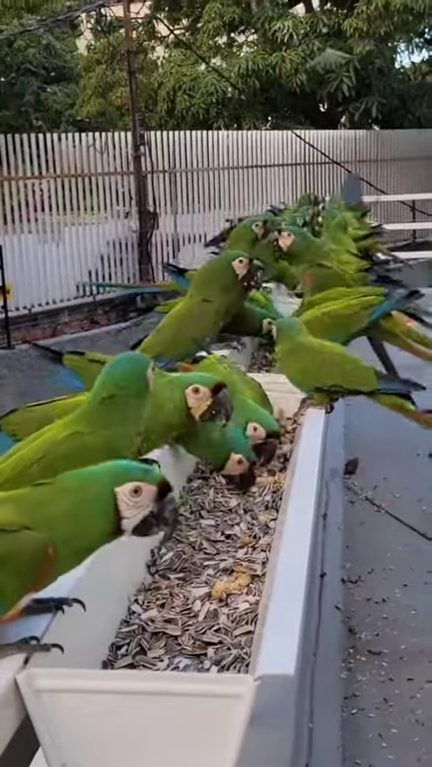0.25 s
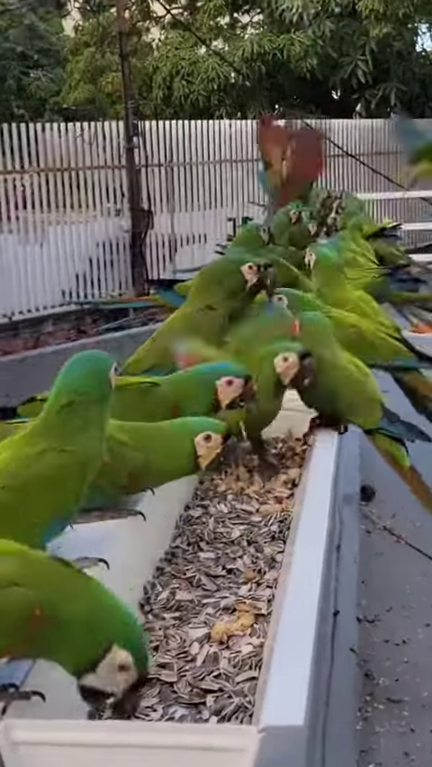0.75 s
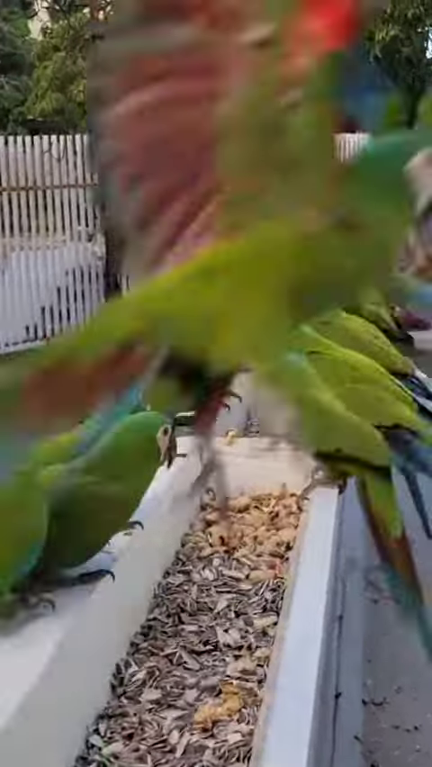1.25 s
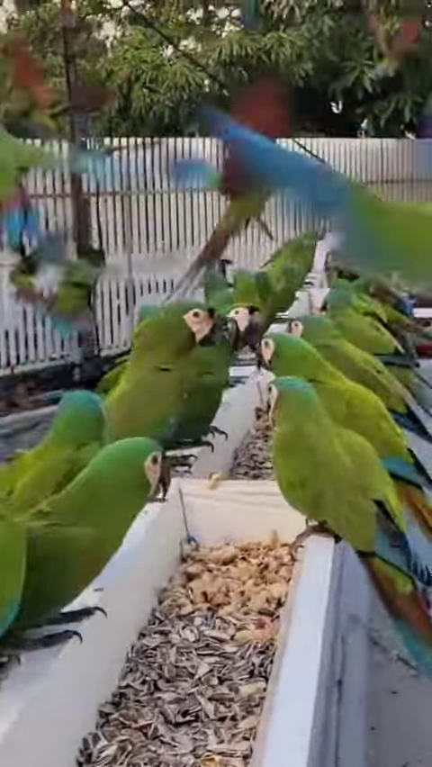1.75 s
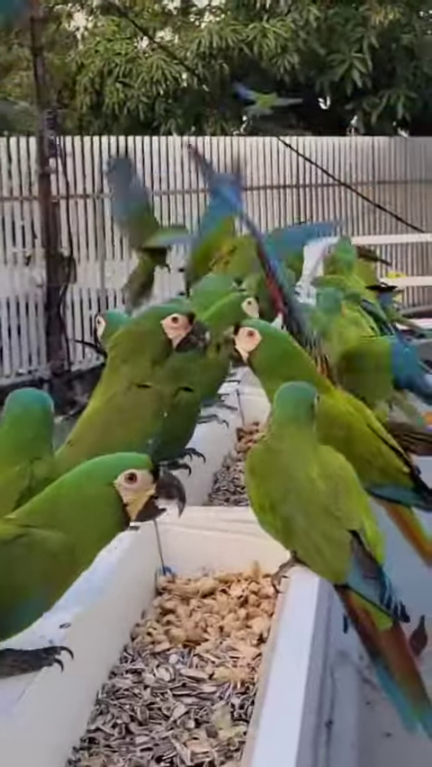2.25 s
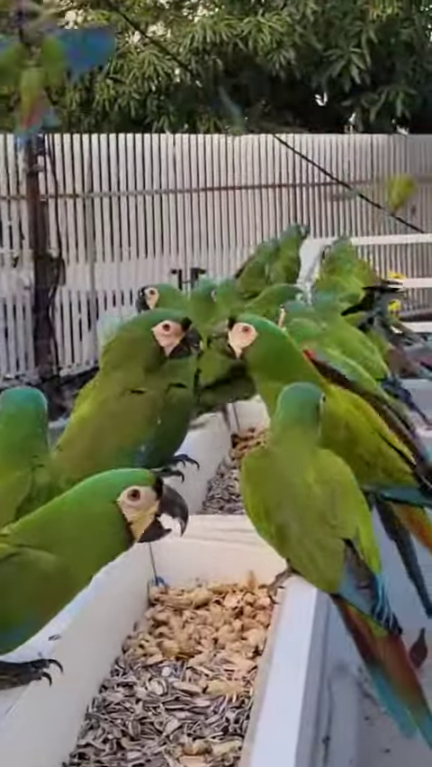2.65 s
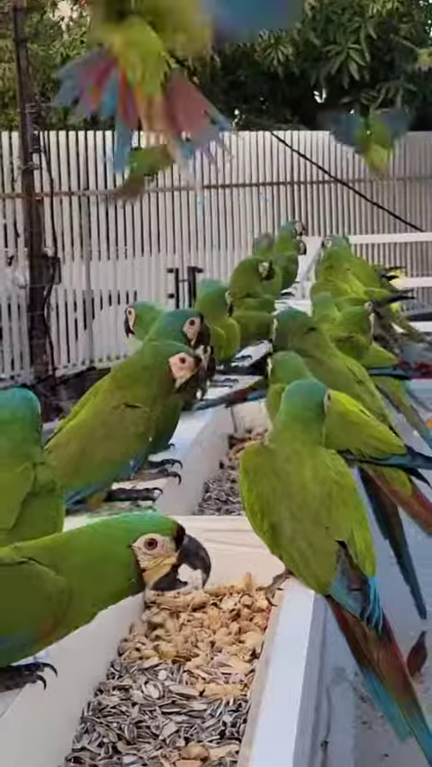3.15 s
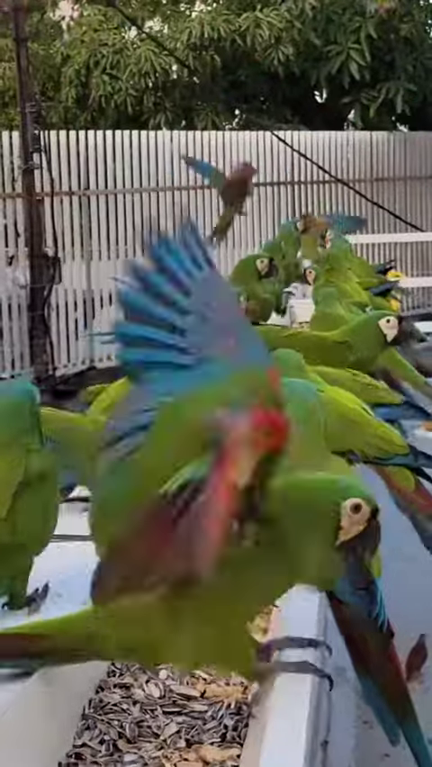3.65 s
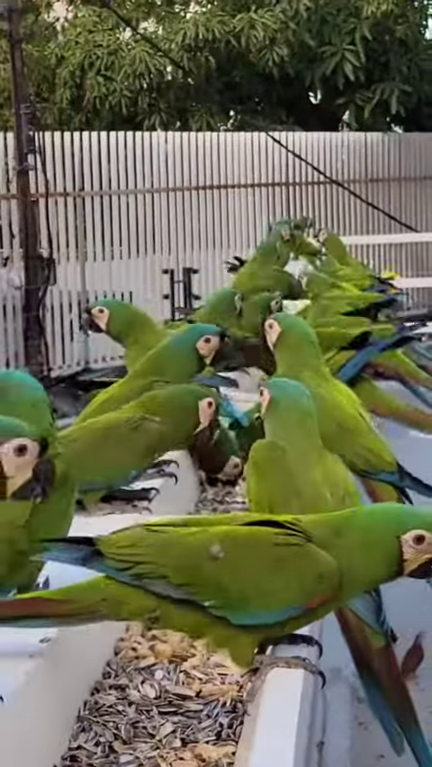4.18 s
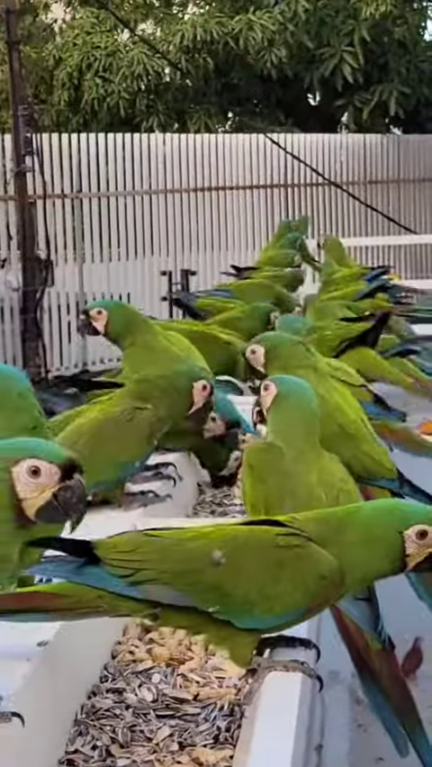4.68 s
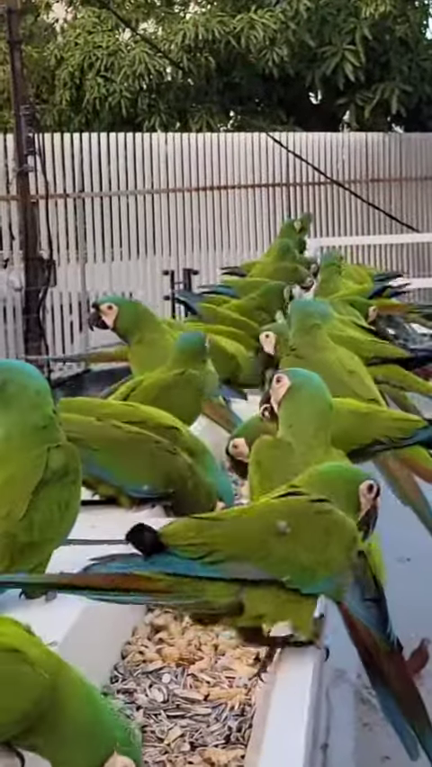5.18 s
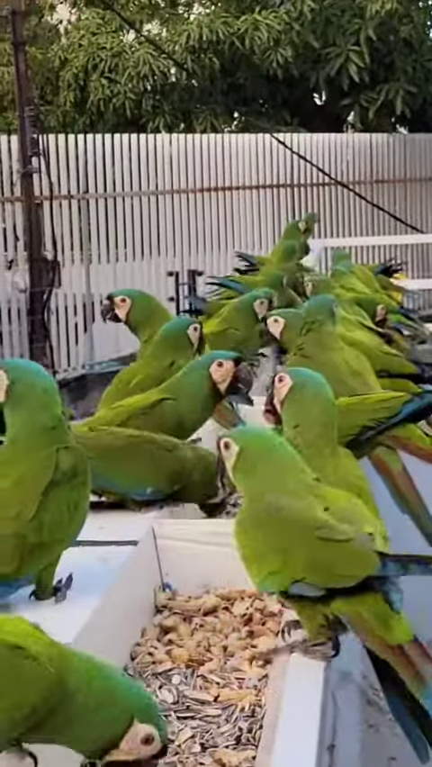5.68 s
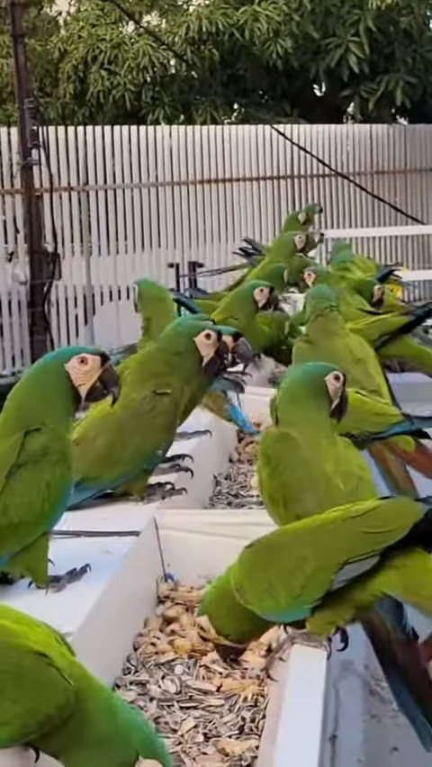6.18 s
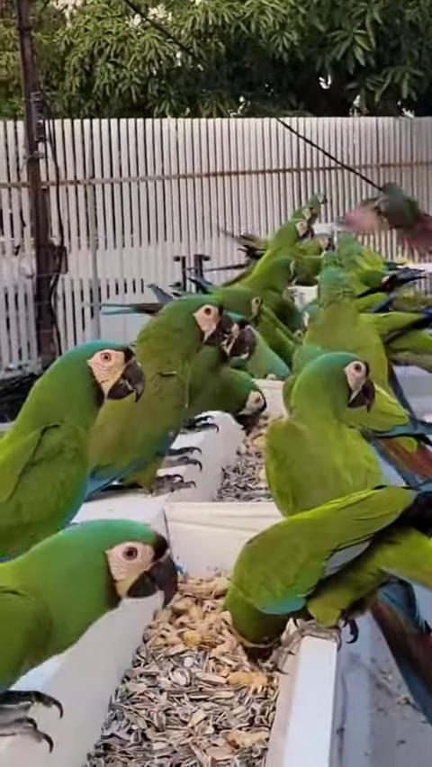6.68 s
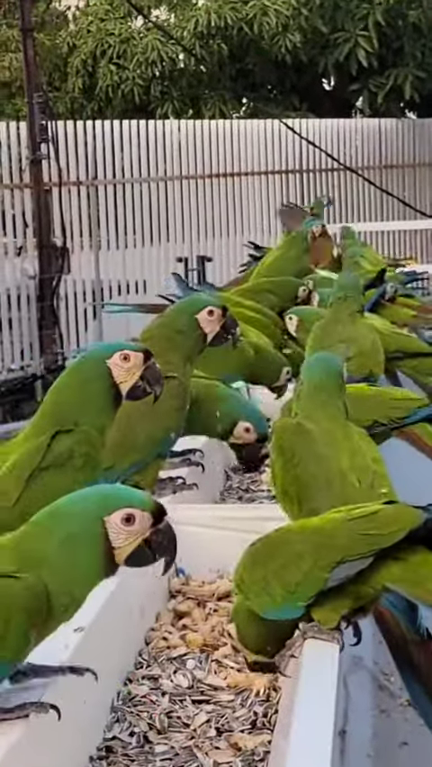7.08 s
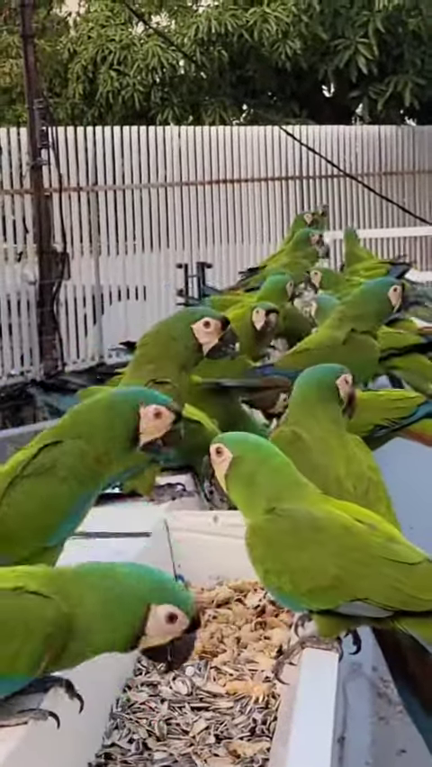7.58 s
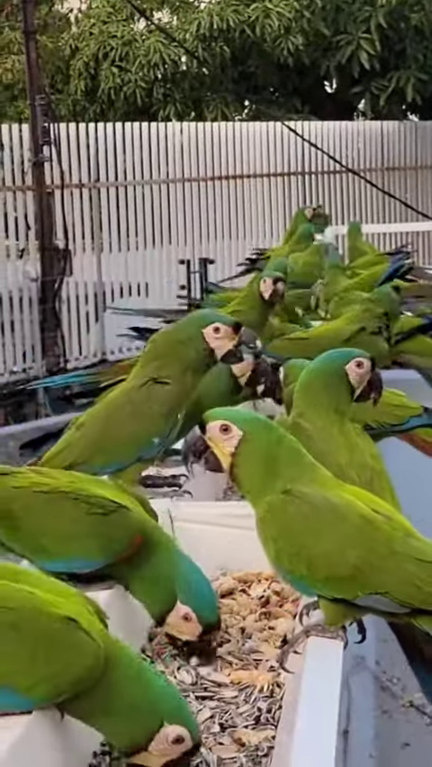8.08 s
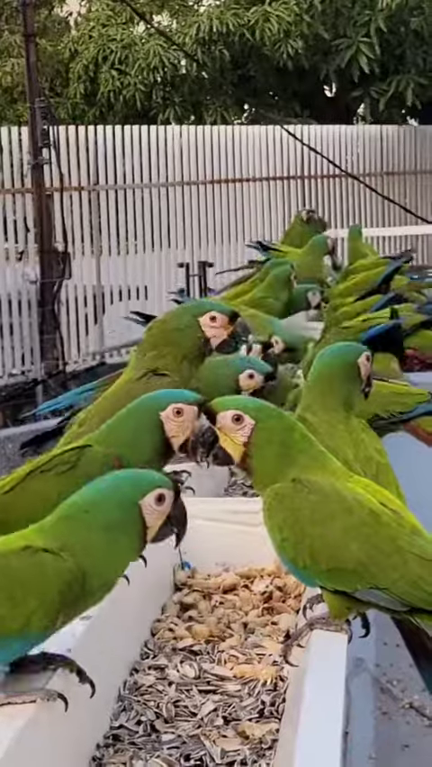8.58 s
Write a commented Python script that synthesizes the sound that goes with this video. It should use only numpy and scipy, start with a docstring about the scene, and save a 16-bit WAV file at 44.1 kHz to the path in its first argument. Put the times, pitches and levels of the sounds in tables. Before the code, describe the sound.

Outdoors in a fenced yard, a flock of small macaws feeds at a seed trough close to the microphone. Distant squawks and cracking husks come first, then wings beat past and loud, harsh squawks come one after another. A calmer gap with far calls follows, then more squawks and low creaky grunts. Rustling and dim traffic rumble continue underneath, with short scattered echoes.

```python
"""Small macaws at a seed trough

A flock squabbles close to the microphone in a fenced yard, over distant traffic and rustling.
Harsh squawks overlap in bursts, with short grunts and far calls between them: pulses and puffs
of air drive throat and beak resonances. Seeds crack as short noise bursts, birds fly past as beating
noise, and scattered echoes answer the voices. Soft hollow tones are wavering sines."""
import sys
import numpy as np
from scipy import signal
from scipy.fft import rfft, irfft, next_fast_len
from scipy.io import wavfile
from scipy.ndimage import uniform_filter1d, minimum_filter1d, map_coordinates

SR = 44100
rng = np.random.default_rng(int(sys.argv[2]) if len(sys.argv) > 2 else 0)


def to_wav(s):
    """Save 16-bit WAV."""
    ch = np.atleast_2d(s).T  # columns
    pcm = np.round(np.clip(ch, -1, 1) * 32767)  # PCM
    wavfile.write(sys.argv[1], SR, pcm.astype(np.int16))


N = 389844

# Traffic spectrum: pitch_hz, level_db (relative)
TRAFFIC_SPECTRUM = [(15, -16), (35, -14.5), (65, 0.5), (100, -1), (160, -7.5), (300, -13), (600, -21.5),
                    (1200, -23.5), (3000, -48)]
# Spectrum of the flock's rustle: pitch_hz, level_db (relative)
RUSTLE_SPECTRUM = [(200, -12), (600, 6.5), (1200, -2), (2500, 0.5), (5000, -7.5), (9000, -14.5),
                   (13000, -12.5)]
# Level of the flock's rustle over time: time_s, level_db
RUSTLE_LEVEL = [(0, -43.5), (.6, -46), (1.1, -46), (3, -51), (4.2, -51), (5.4, -47), (6.1, -51), (7.5, -45),
                (8.1, -53), (8.84, -46.5)]
# Far engines: start_s, length_s, pitch_hz, start_level_db, change_over_length_db
ENGINES = [(3.93, 1.9, 129.1, -41.5, -4.5), (7.72, .9, 61.86, -44, 7)]
# Calls from across the yard: start_s, length_s, loudest_at (share of length), level_db (before the mix),
# open_beak_db (relative to throat), pitch_hz
FAR_CALLS = [(0, 0.42, .78, -37, -8, 635), (0.481, .34, 0.83, -36.5, -6, 615),
             (0.959, 0.33, 0.34, -34.5, -5, 632), (4.329, .26, 0.22, -32, -12, 688),
             (4.711, .41, .6, -40, -4.5, 667), (5.15, 0.48, 0.43, -39.5, -5.5, 635),
             (7.499, 0.31, 0.43, -40.5, -8.5, 686)]
# Throat spectrum of the far voices: pitch_hz, level_db (relative)
FAR_THROAT = [(500, -60), (1000, -31), (1400, -3.5), (1700, -12), (2100, -5.5), (2600, 3), (3000, -7.5),
              (3600, -23), (5000, -44)]
# Open-beak spectrum of near and far voices: pitch_hz, level_db (relative)
BEAK = [(2800, -29), (3400, 3.5), (4200, 2.5), (5000, 1), (5600, -7), (6600, -68)]
# Seed husks cracking: start_s, level_db (before the crack trim)
CRACKS = [(.0352, -25), (.0624, -27), (.2698, -29), (.6413, -17.5), (.6514, -23), (.769, -22), (.8738, -27),
          (.9412, -27), (1.031, -16), (1.0495, -16), (1.0739, -22), (2.575, -17), (4.6428, -29),
          (5.3652, -31), (5.4124, -28), (5.6025, -24.5), (5.6173, -25), (5.867, -25), (7.969, -19),
          (7.9853, -19), (8.043, -21.5), (8.7888, -28.5)]
# Husk spectrum: pitch_hz, level_db (relative)
HUSK = [(300, -8), (900, -20), (2000, -22), (4300, 1.5), (6500, -0.5), (9000, 0), (12500, 5.5)]
# Birds flying past: nearest_s, approach_s, retreat_s, swish_db, gust_db (both before trim)
WINGS = [(1.06, 0.51, 0.29, -27, -29), (1.26, 0.15, 0.66, -24, -26.5), (1.95, 0.46, 0.52, -33.5, -33.5),
         (3.43, .25, 0.19, -38.5, -49), (3.7, .12, 0.49, -37, -39)]
# Spectrum of the feather swish: pitch_hz, level_db (relative)
FEATHERS = [(90, -24), (200, -6.5), (350, 2.5), (550, -6), (1200, -10.5), (3000, -13.5), (6000, -21),
            (13000, -20.5)]
# Spectrum of air pushed on the microphone: pitch_hz, level_db (relative)
GUST = [(10, -17), (30, -5), (55, -2), (110, -8), (250, -35), (600, -70)]
# Near squawks: start_s, length_s, rise_s, fall_s, effort_db, swell_db (over the call),
# throat_db, beak_db, hiss_db, echo_db (these four relative to effort), pitch_hz, roughness (0-1),
# chest_db (lift), throat_hz, beak_hz, hiss_hz
SQUAWKS = [ (1.178, .382, 0.12, .04, -14, 1, -2, -2.5, -9, -13.5, 668.7, .62, 6.5, 1630, 4280, 7960),
           (1.53, 0.3, 0.028, 0.025, -19, -2.5, -3.5, -4, -11, -13, 688, 0.82, 6.5, 1180, 4200, 7300),
           (1.765, .37, 0.12, 0.029, -9.5, -1.5, -8, -7.5, -13, -13, 672, 0.5, 4.5, 1670, 3920, 6250),
           (2.109, 0.23, 0.022, 0.042, -22.5, -3.5, -4, -5.5, -13, -12, 659, .63, 0, 1270, 4330, 6400),
           (2.291, .33, 0.034, 0.087, -23, -1, -8.5, -5.5, -11, -12.5, 670, .6, 7, 1270, 4380, 6450),
           (2.56, 0.18, .02, 0.023, -31, -1, -9, -21, -20, -7, 658, 0.62, 3, 1260, 4240, 6450),
           (2.704, .25, 0.097, 0.029, -21, 0, -5, -9.5, -15, -13, 646, 0.6, 1, 1180, 3580, 7450),
           (2.931, 0.3, .02, 0.028, -27, 2, -7.5, -7, -19, -11, 614, 0.84, 3, 1240, 4100, 7100),
           (3.17, .32, 0.081, 0.042, -22, -1.5, -3, -2, -11.5, -16, 654.5, 0.71, 6, 1400, 4320, 7600),
           (3.45, 0.2, 0.022, 0.032, -30.5, -4, -8.5, -5, -19.5, -13, 647, .5, -5, 1000, 4200, 8300),
           (3.579, .2, 0.055, 0.023, -29.5, 7.5, -2, 0.5, -9.5, -13, 662, .5, -3, 1000, 4200, 8300),
           (3.71, 0.37, 0.11, 0.052, -13, 1, -3, -10, -17, -14, 682.3, 0.54, 1.5, 1920, 4400, 8100),
           (4.03, 0.37, 0.027, .11, -20.5, 1, -9, -2.5, -9, -11.5, 682.4, .52, 4, 1600, 4800, 5900),
           (5.64, 0.43, 0.19, 0.18, -37, 0, 1.5, -5, -14.5, -9, 665, 0.39, -23, 1320, 4600, 6600),
           (6.135, 0.39, 0.14, .03, -24, 3.5, -8.5, 2, -8.5, -11.5, 702, 0.5, 2, 1470, 4780, 9500),
           (6.495, .32, 0.046, 0.063, -18.5, 4, -6.5, -5.5, -13, -11.5, 670.4, .48, 4, 1260, 4250, 6200),
           (6.769, 0.37, 0.013, 0.065, -26, -4, -6, 1, -8, -6.5, 685, .5, 1, 1460, 4900, 6350),
           (7.112, .36, 0.027, 0.032, -10, -2.5, -13.5, -10.5, -14, -14.5, 690, 0.4, 9, 1240, 4100, 5700),
           (8.137, 0.37, 0.16, .02, -24.5, 10, 4.5, -9.5, -15.5, -8, 700, .46, -7.5, 1870, 4080, 6000)]
# Throat spectrum of the near voices: pitch_hz, level_db (relative)
THROAT = [(300, -65), (600, -22.5), (820, -13.5), (1060, -9.5), (1290, 3), (1480, -1.5), (1700, -0.5),
          (2100, -4), (2350, -16), (2700, -72)]
# Ring of the near voices at the reference pitch: pitch_hz, level_db (relative)
RING = [(1800, -20.5), (2250, -5), (2500, 4), (2700, 6), (2900, 1), (3100, 3.5), (3400, -19), (4000, -69)]
# Hiss of the near voices: pitch_hz, level_db (relative)
HISS = [(4600, -50), (5700, 1.5), (6800, -0.5), (8000, 0), (9300, -4.5), (11000, -6), (13000, -4.5)]
# Short grunts: start_s, length_s, level_db (before trim), pitch_hz, throat_hz
GRUNTS = [(1.19, 0.078, -27, 428, 1660), (2.156, 0.024, -30.5, 438, 1310), (2.673, 0.037, -28.5, 513, 1480),
          (3.126, 0.025, -24, 789, 1390), (3.16, 0.027, -27, 470, 1360), (3.431, 0.025, -28.5, 384, 1400),
          (3.505, 0.032, -34.5, 547, 1140), (3.638, .06, -24.5, 648, 1950), (6.134, 0.016, -42, 257, 850),
          (6.17, 0.016, -39, 260, 900), (6.211, .036, -33, 262, 970), (6.255, 0.038, -30.5, 250.5, 1000),
          (6.30, 0.039, -30, 269, 970), (6.351, 0.035, -33, 258, 910), (6.557, 0.15, -34, 263.7, 840),
          (6.673, 0.1, -36.5, 260, 820), (7.709, .028, -40, 305, 1190), (7.741, .026, -37, 290, 1400),
          (7.775, .028, -29.5, 325, 1350), (7.811, 0.04, -28.5, 336.6, 1350),
          (7.864, .034, -32, 318.7, 1320)]
# Grunt spectrum: pitch_hz, level_db (relative)
GRUNT_COLOUR = [(200, -37), (450, -7), (700, 11.5), (1400, 1), (2100, 2.5), (2700, 5.5), (3300, -4),
                (4200, 0), (5500, -14), (12000, -20.5)]
# Echo decay by band: pitch_hz, time_to_fall_60_db_s
ECHO_DECAY = [(200, 1), (1300, 0.31), (2700, 0.75), (5000, 0.66), (12000, 0.37)]
# Faint hollow tones: start_s, length_s, level_db, pitch_hz
HOOTS = [(4.598, .25, -55, 680), (4.953, 0.4, -49, 710), (5.981, .14, -50, 572), (7.842, 0.27, -50.5, 690)]

TRAFFIC_DB = -38.5
FAR_START_DB, FAR_END_DB = -6, -12.5  # a far call swells from one and fades to the other
PASS_DB = -17.5  # level at the start of a wing approach and the end of its retreat
ONSET_DB, RELEASE_DB = -17.5, -15.5  # push of air at the first and last moment of a squawk
RING_LAW, THROAT_LAW, BEAK_LAW, HISS_LAW = 1.31, 0.92, 1, 1.31  # dB of each part per dB of push
JITTER, FLUTTER = 0.058, 0.19  # pitch jitter share at full roughness; flutter depth
CHEST_HZ = 900
RING_ORDER, RING_LIFT_DB = 4, 7  # harmonic that rings; its lift in a voice without roughness
RING_PITCH_HZ = 672  # the ring has its listed shape at this pitch and moves with the voice
EDGE_HZ = 13250  # upper band limit


def amp(db):
    """Turns decibels into gain."""
    return 10 ** (np.asarray(db) / 20)


def evened(x):
    """Scales a sound to rms 1."""
    return x / np.sqrt(np.mean(x ** 2) + 1e-20)


def read(points, hz):
    """Reads a (Hz, value) table along a log-frequency axis."""
    f, value = np.transpose(points)
    return np.interp(np.log(hz + 1), np.log(f + 1), value)


def add(mix, s, sound):
    """Mixes a sound in at time s, cut off at the end of the mix."""
    part = mix[round(s * SR):][:len(sound)]
    part += sound[:len(part)]


def shaped(x, points, *resonances):
    """Gives a sound a spectrum, with resonances (Hz, width Hz, dB) on top; rms 1."""
    size = next_fast_len(len(x))
    hz = np.fft.rfftfreq(size, 1 / SR)
    db = read(points, hz)
    for centre, width, lift in resonances:
        db = db + lift / (1 + (2 * (hz - centre) / width) ** 2)
    return evened(irfft(rfft(x, size) * amp(db), size)[:len(x)])


def wander(count, rate_hz):
    """Smooth random drift, from noise rolled off above rate_hz; rms about 1."""
    size = next_fast_len(count + SR // 4)
    hz = np.fft.rfftfreq(size, 1 / SR)
    spectrum = rfft(rng.standard_normal(size)) / (1 + (hz / rate_hz) ** 4)
    return evened(irfft(spectrum, size))[:count]


def edges(count, fade_s):
    """A window that fades in and out."""
    t = np.arange(count) / SR
    return np.sqrt(np.clip(np.minimum(t, t[-1] - t) / fade_s, 0, 1))


def traffic():
    """Distant traffic as low-weighted noise."""
    return amp(TRAFFIC_DB) * shaped(rng.standard_normal(N), TRAFFIC_SPECTRUM)


def flock_rustle():
    """The rustle of many birds as noise whose level rises, falls and flickers."""
    level = np.interp(np.arange(N) / SR, *np.transpose(RUSTLE_LEVEL))
    flicker_db = 2.0 * wander(N, 25)
    return amp(level + flicker_db) * shaped(rng.standard_normal(N), RUSTLE_SPECTRUM)


def engines(drift=0.016, throb_db=3):
    """Far engines drone in and out as sines with drifting pitch and throbbing level."""
    out = np.zeros(N)
    for s, length, hz, db, change in ENGINES:
        u = np.linspace(0, 1, int(length * SR))
        turns = np.cumsum(hz * (1 + drift * wander(len(u), 3.36))) / SR
        drone = np.sqrt(2) * np.sin(2 * np.pi * turns)
        level = db + change * u + throb_db * wander(len(u), 6.8)
        add(out, s, edges(len(u), 0.1) * amp(level) * drone)
    return out


def syrinx(hz, rough, jitter, flutter, flutter_hz=145, order=18):
    """Jittery pulses and puffs of air, shaken by a slower, uneven second oscillation."""
    count = len(hz)
    shake_hz = flutter_hz * (1 + 0.2096 * wander(count, 92))
    shake = np.cos(2 * np.pi * np.cumsum(shake_hz) / SR)
    bend = jitter * (wander(count, 260) + 0.43 * shake) + 0.015 * wander(count, 25)
    turns = np.cumsum(hz * (1 + bend)) / SR
    pulses = np.zeros(count)
    for k in range(1, order + 1):
        weight = 0.35 if k == 1 else 1  # weak fundamental
        pulses += weight * np.cos(2 * np.pi * k * (turns + 0.03015 * k))
    # each puff is strongest at the start of its cycle
    puffs = (0.5 + np.exp(-(turns % 1) / 0.27)) * rng.standard_normal(count)
    source = (1 - rough) * evened(pulses) + 2.11 * rough * evened(puffs)
    return source * (1 + flutter * shake)


def sway(x, depth=0.0163, rate_hz=11):
    """Pitch and resonances drift together as the bird works its neck and beak."""
    speed = 1 + depth * wander(len(x), rate_hz)
    at = np.cumsum(speed / speed.mean()) - 1
    return map_coordinates(x, [at], order=3, mode="nearest")


def far_calls():
    """The same kind of voice from further off, without hiss; each call swells and fades."""
    out = np.zeros(N)
    for s, length, top, level, gape, hz in FAR_CALLS:
        u = np.linspace(0, 1, int(length * SR))
        push = np.interp(u, [0, top, 1], [FAR_START_DB, 0, FAR_END_DB])
        drive = syrinx(np.full(len(u), hz), rough=0.41, jitter=0.0324, flutter=0.18)
        voice = amp(push) * shaped(drive, FAR_THROAT)
        voice += amp(gape + 0.93 * push) * shaped(drive, BEAK, (3900, 900, 8))
        add(out, s, edges(len(u), 0.015) * amp(level) * sway(voice))
    return out


def yard_echo(x):
    """Scattered reflections off fence and trees, each band dying at its own speed."""
    sparse = rng.random(SR) < 2000 / SR  # about 2000 reflections a second
    late = np.arange(SR) > 0.008 * SR
    taps = rng.standard_normal(SR) * sparse * late
    hz, t, z = signal.stft(taps, SR, nperseg=256)
    decay = amp(-60 * t / read(ECHO_DECAY, hz)[:, None])
    tail = signal.istft(z * decay, SR, nperseg=256)[1]
    return signal.fftconvolve(x, tail / np.linalg.norm(tail))[:N]


def seeds(crack_db=-8.5, stir_db=-53, per_s=60):
    """Single husks snap in a beak over a light ticking of stirred seeds: fast-dying noise."""
    t, out = np.arange(1024) / SR, np.zeros(N)
    snap = np.exp(-t / 0.0025) + 0.15 * np.exp(-t / 0.023)
    events = [(s, db + crack_db) for s, db in CRACKS]
    for place, chance in rng.random((int(per_s * N / SR), 2)):
        # most ticks are faint, a few up to 12 dB stronger
        events.append((place * N / SR, stir_db + 4 * min(-np.log(chance), 3)))
    for s, db in events:
        husk = shaped(rng.standard_normal(len(t)), HUSK, (rng.uniform(3100, 17400), 2400, 7))
        add(out, s, amp(db) * snap * husk)
    return out


def wings(beat_hz=11, depth=0.32, swish_trim_db=-2, gust_trim_db=-1):
    """A bird nears and leaves: each wing beat swishes; the draught rumbles on the microphone."""
    out = np.zeros(N)
    for s, approach, retreat, swish, gust in WINGS:
        t = np.arange(-approach, retreat, 1 / SR)
        count = len(t)
        distance = np.maximum(-t / approach, t / retreat)  # 0 nearest, 1 furthest
        nearness = edges(count, 0.04) * amp(PASS_DB * distance)
        beat_turns = np.cumsum(beat_hz * (1 + 0.37 * wander(count, 6.9))) / SR
        beats = evened(1 + depth * np.cos(2 * np.pi * beat_turns))
        feathers = amp(swish + swish_trim_db) * beats * shaped(rng.standard_normal(count), FEATHERS)
        draught = amp(gust + gust_trim_db) * shaped(rng.standard_normal(count), GUST)
        add(out, s - approach, nearness * (feathers + draught))
    return out


def trough(x, bounce=0.24, count=4):
    """The walls of the trough send back a few very early reflections, different for each call."""
    out = x.copy()
    for delay, sign in zip(rng.uniform(0.001, 0.006, count), rng.choice([-1, 1], count)):
        add(out, delay, sign * bounce * x)
    return out


def squawks(arch=0.01, strain_db=2, sag=0.04, fade_s=0.0044):
    """Near birds and what they send into the yard: a push of air rises, holds and drops.

    Ring and hiss grow faster than the push; an open beak adds rasp and hiss.
    """
    out, sent = np.zeros(N), np.zeros(N)
    for (s, length, rise, fall, effort, swell, low, gape, hiss, echo,
         hz, rough, chest_db, throat_hz, beak_hz, hiss_hz) in SQUAWKS:
        t = np.arange(int(length * SR)) / SR
        u = t / length
        push = swell * (u - 0.5)
        push += ONSET_DB * np.maximum(1 - t / rise, 0) ** 2
        push += RELEASE_DB * np.maximum(1 - (length - t) / fall, 0)
        pitch = hz * (1 + arch * (np.sin(np.pi * u) - 0.5) - sag * u ** 20)  # sags at the end
        drive = trough(syrinx(pitch, rough, JITTER * rough, FLUTTER))
        strain = strain_db * wander(len(u), 16.5)  # the upper partials come and go
        ring = [(f * hz / RING_PITCH_HZ, db) for f, db in RING]
        # roughness smears the ring on the fourth harmonic
        ring_peak = (RING_ORDER * hz, 260, RING_LIFT_DB * (1 - rough))
        chest_peak, throat_peak = (CHEST_HZ, 400, chest_db), (throat_hz, 330, 5.5)
        voice = amp(RING_LAW * push) * shaped(drive, ring, ring_peak)
        voice += amp(low + THROAT_LAW * push) * shaped(drive, THROAT, chest_peak, throat_peak)
        voice += amp(gape + BEAK_LAW * push + 0.5 * strain) * shaped(drive, BEAK, (beak_hz, 480, 8))
        voice += amp(hiss + HISS_LAW * push + strain) * shaped(drive, HISS, (hiss_hz, 700, 6))
        call = edges(len(t), fade_s) * amp(effort) * sway(voice)
        add(out, s, call)
        add(sent, s, amp(echo) * call)
    return out, sent


def grunts(trim_db=1.5):
    """Low, creaky notes from the same pulsing source, whose pitch arches and sags."""
    out = np.zeros(N)
    for s, length, db, hz, throat_hz in GRUNTS:
        u = np.linspace(0, 1, int(length * SR))
        pitch = hz * (1.03 - 0.35 * (u - 0.45) ** 2)
        drive = syrinx(pitch, rough=0.27, jitter=0.035, flutter=0.3, order=24)
        note = shaped(drive, GRUNT_COLOUR, (throat_hz, 520, 17))
        add(out, s, amp(db + trim_db) * note * signal.windows.tukey(len(u), 0.6))
    return out


def hoots():
    """Soft, slightly wavering sine tones."""
    out = np.zeros(N)
    for s, length, db, hz in HOOTS:
        count = int(length * SR)
        turns = np.cumsum(hz * (1 + 0.018 * wander(count, 39.3))) / SR
        tone = np.sqrt(2) * np.sin(2 * np.pi * turns)
        add(out, s, amp(db) * tone * signal.windows.tukey(count, 0.6))
    return out


def scene():
    """Birds near and far with their echo, the small sounds of feeding, and the background."""
    background = traffic() + flock_rustle() + engines()
    far = far_calls()
    near, sent = squawks()
    low = grunts()
    echo = yard_echo(sent + amp(-12) * low + amp(-6.5) * far)
    voices = near + low + amp(-2.5) * far + echo
    mid = background + voices + seeds() + wings() + hoots()
    # the sound is centred; only the treble flickers between left and right
    treble_band = signal.butter(12, [4100, 12400], "band", fs=SR, output="sos")
    side = amp(-11.5) * signal.sosfilt(treble_band, mid) * wander(N, 120)
    return np.array([mid + side, mid - side])


def record(dry, ceiling=0.74):
    """A fast limiter holds down the loudest peaks; then a low-pass sets the band limit."""
    room = np.minimum(1, ceiling / (abs(dry).max(0) + 1e-9))
    gain = uniform_filter1d(minimum_filter1d(room, size=65), size=65)
    lowpass = signal.firwin(511, EDGE_HZ, window=("kaiser", 9), fs=SR)
    return signal.oaconvolve(dry * gain, lowpass[None], "same")


dry = scene()
out = record(dry)
to_wav(out)
```